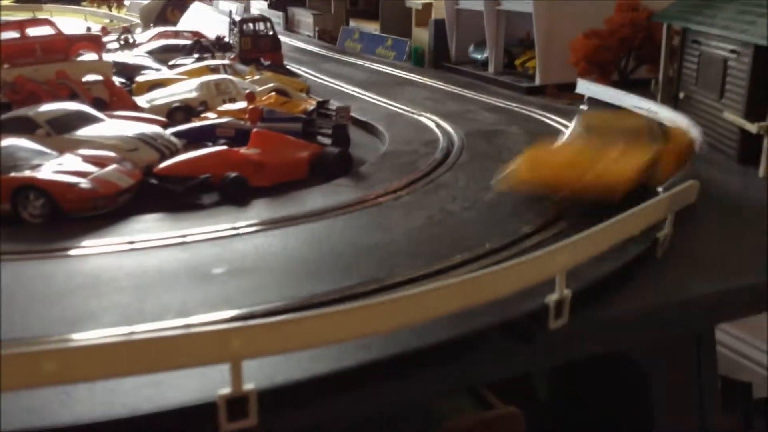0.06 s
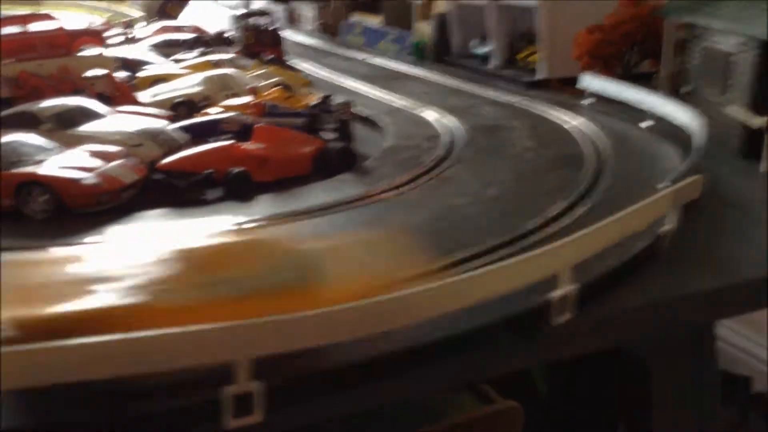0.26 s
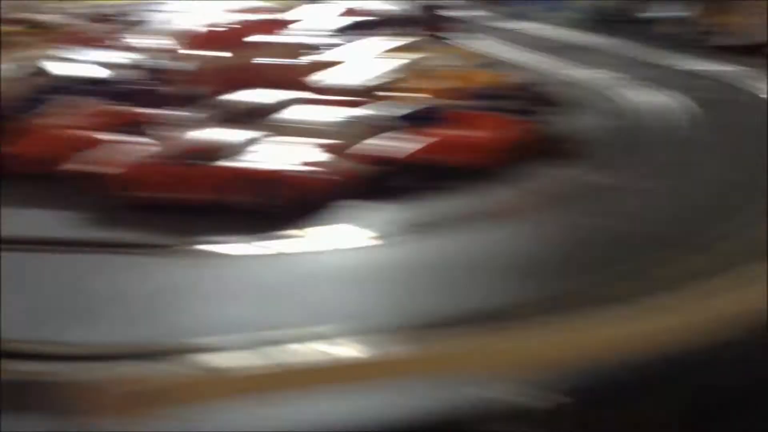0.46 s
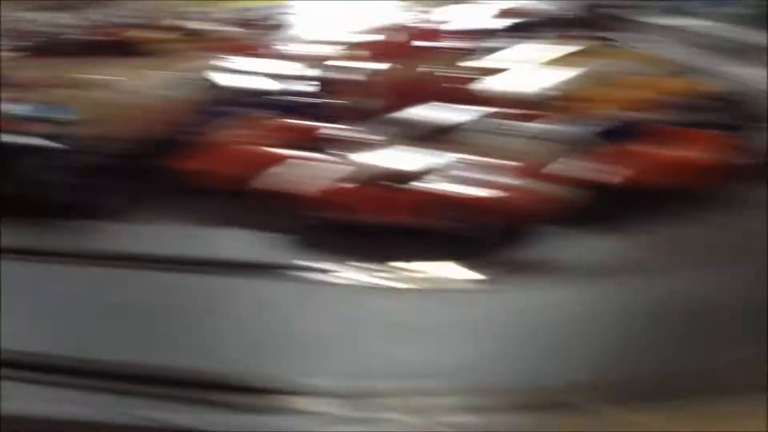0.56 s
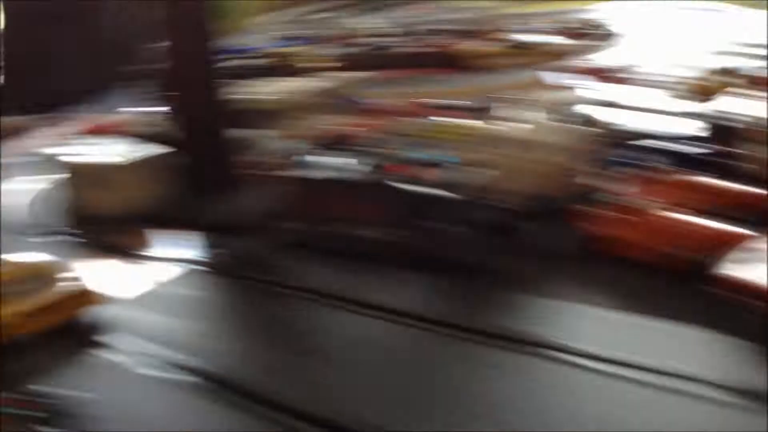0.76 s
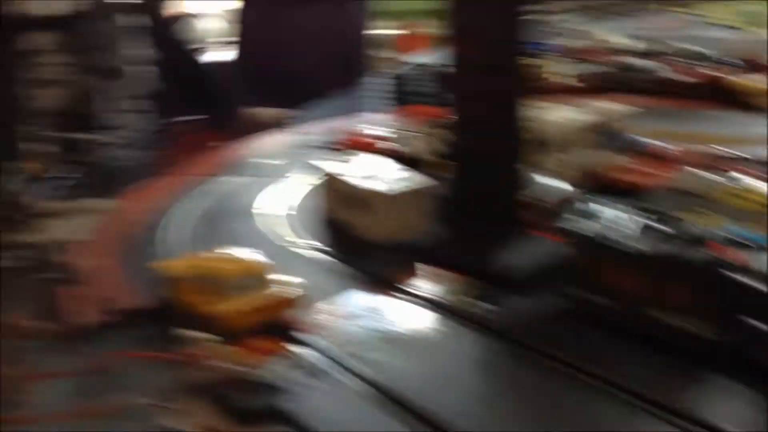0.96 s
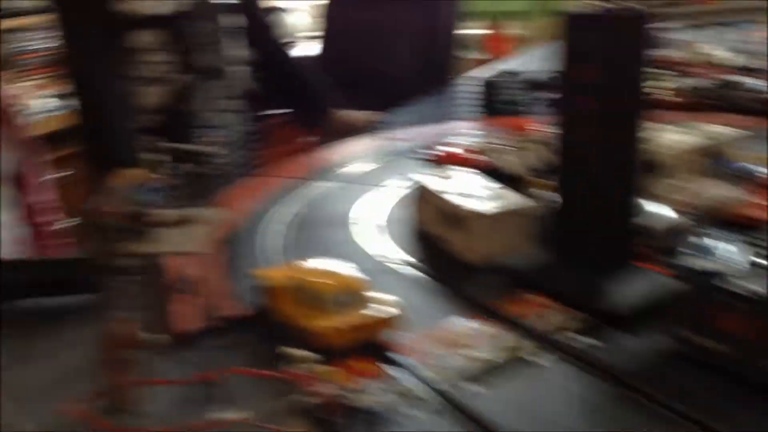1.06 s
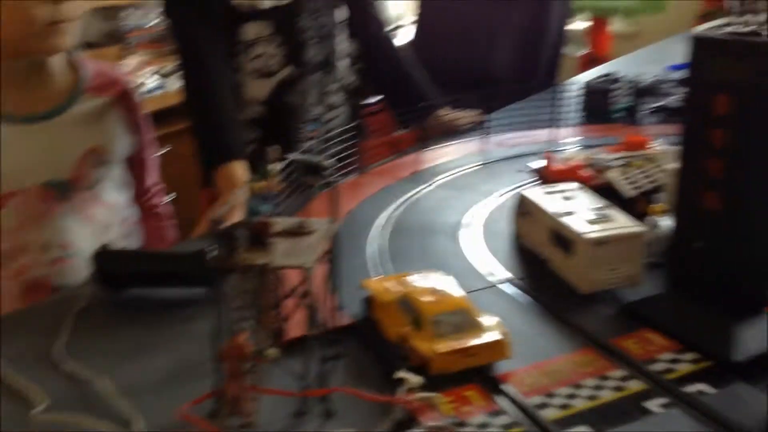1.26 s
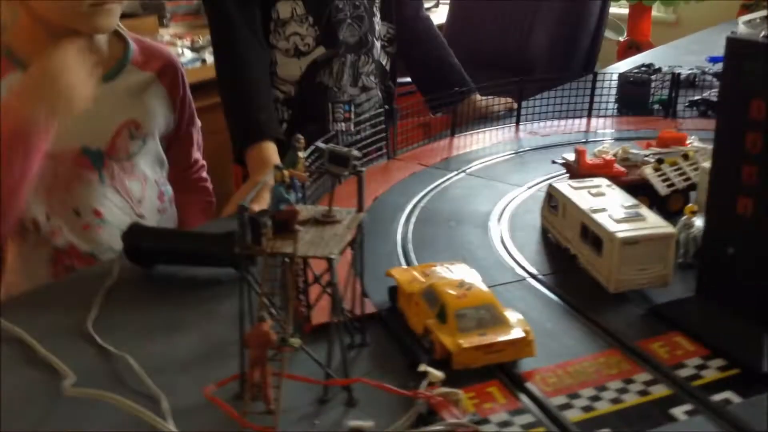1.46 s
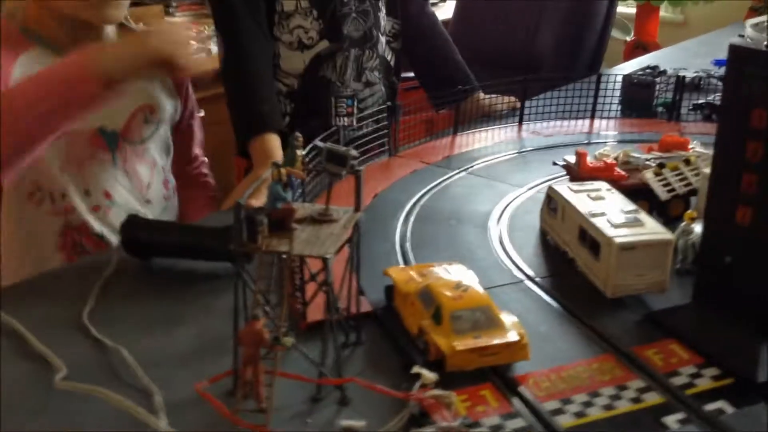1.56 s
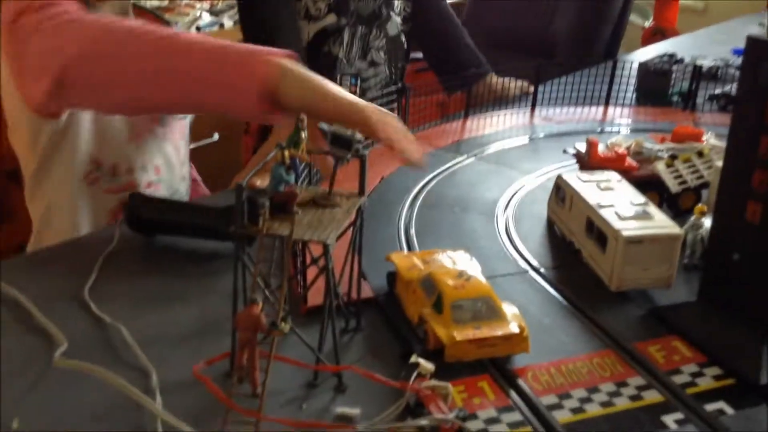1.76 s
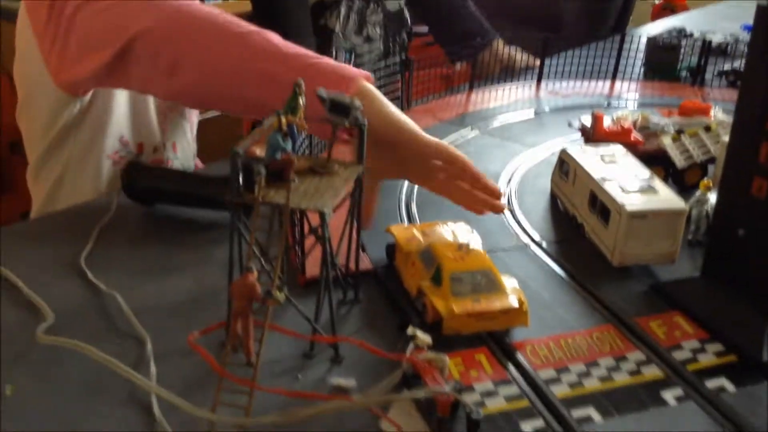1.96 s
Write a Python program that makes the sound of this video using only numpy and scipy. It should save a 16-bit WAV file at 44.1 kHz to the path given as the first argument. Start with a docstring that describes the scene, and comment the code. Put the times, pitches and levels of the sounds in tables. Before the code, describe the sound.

A toy slot car races close by from the start, with a rough gear buzz, a bright metallic scrape, a hollow rumble and quick clacks over the track joints. From about 0.6 seconds it slows and fades, stopping at around 1 second. A soft hiss and a low drone remain in the small room, with a few faint handling knocks between 1.6 and 2 seconds.

```python
"""Toy slot car coasting to a stop.

A slot car rattles round a plastic track close by, clacks over the joints, then coasts to a stop.
Loose gear teeth buzz in the body, the pick-up braids scrape the rails, the hollow track rumbles.
A soft hiss, a low drone and a few faint handling knocks stay on in the small room."""
import sys
import numpy as np
from scipy import signal
from scipy.fft import rfft, irfft
from scipy.io import wavfile
from scipy.ndimage import map_coordinates

SR = 44100
rng = np.random.default_rng(int(sys.argv[2]) if len(sys.argv) > 2 else 0)


def master_out(mix):
    """Clip the mix to full scale and print it as 16-bit PCM to the path in sys.argv[1]."""
    frames = np.transpose(np.atleast_2d(mix))
    ceiling = np.clip(frames, -1, 1)
    pcm = np.round(ceiling * 32767).astype(np.int16)
    wavfile.write(sys.argv[1], SR, pcm)


N = 88773

# motor winding down: time_s, turns_per_s
MOTOR_SPEED = [(0, 104.3), (.45, 101), (.65, 94), (.85, 70), (1.02, 31.3)]
# midrange buzz of the car's body: frequency_hz, relative_db
BODY_COLOUR = [(200, -29.5), (500, -18.5), (650, -13), (750, -7), (860, -9), (970, 1.5), (1500, -2),
               (2100, -1), (3100, -4), (4000, -12.5), (7000, -16.5), (15000, -33)]
# bright scrape of braids on rails: frequency_hz, relative_db
BRAID_COLOUR = [(800, -27), (3000, -13), (4500, -11.5), (5600, -8), (7000, -4.5), (8300, -0.5), (9500, -6),
                (11000, -11), (15000, -21)]
# hollow boom of the track: frequency_hz, relative_db
TRACK_COLOUR = [(40, -16), (100, -21.5), (140, -6), (180, 2.5), (260, -6.5), (350, -0.5), (500, -10.5),
                (900, -6.5), (3000, -62)]


def undb(db):
    """Decibels to gain."""
    return 10 ** (np.asarray(db) / 20)


def unit(x):
    """Scale to an RMS of one."""
    return x / np.sqrt(np.mean(x ** 2))


def curve(rows):
    """Straight lines through (time_s, value) rows."""
    return np.interp(np.arange(N) / SR, *np.array(rows, float).T)


def fading(rows, stop_db_per_s=300):
    """Gain from a level curve that dies away after its last point."""
    past_end_s = np.maximum(np.arange(N) / SR - rows[-1][0], 0)
    return undb(curve(rows) - stop_db_per_s * past_end_s)


def through(x, response):
    """Play a signal through an impulse response."""
    return signal.fftconvolve(x, response)[:N]


def colour(points, size=2048):
    """Minimum-phase response of unit energy with the given spectral shape."""
    hz, db = np.array(points, float).T
    log_f = np.log(np.maximum(np.fft.rfftfreq(size, 1 / SR), 1))
    bass_rolloff = 2 * np.maximum(np.log(hz[0]) - log_f, 0)
    gain = undb(np.interp(log_f, np.log(hz), db))
    cepstrum = irfft(np.log(gain) - bass_rolloff)
    cepstrum[1:size // 2] *= 2
    cepstrum[size // 2 + 1:] = 0
    response = irfft(np.exp(rfft(cepstrum)))
    return response / np.linalg.norm(response)


def walk(rate_hz):
    """Smooth random wander with a spread near 1."""
    return map_coordinates(rng.standard_normal(4096), [np.arange(N) / SR * rate_hz], mode="wrap")


def background(air_db=-56.5, drone_db=-57, waver_db=0.5, sag_start_s=1.6, sag_per_s=0.81):
    """A soft hiss that ebbs, a low wavering drone that sinks near the end, and still room air."""
    # thin, bright hiss: frequency_hz, relative_db
    hiss_colour = [(200, -23.5), (450, -13), (1000, -16), (2500, -11), (4400, -8.5), (6500, -4.5),
                   (8400, -0.5), (10000, -7), (12000, -16), (15000, -21)]
    # ebb of the hiss: time_s, level_db
    hiss_level = [(0, -23), (1.0, -44.5), (1.12, -45), (1.45, -45.5), (1.74, -49), (1.82, -51), (2.01, -53)]
    # drone before it sinks: frequency_hz, relative_db
    drone_colour = [(30, -34), (90, -27), (150, -11), (200, -8.5), (265, 1), (330, 0.5), (400, -10.5),
                    (600, -28.5), (2000, -42)]
    # still room air: frequency_hz, relative_db
    air_colour = [(30, -12), (100, -3), (200, 0.5), (600, 1), (1600, 1.5), (3000, -2), (8000, -10.5),
                  (15000, -24)]
    t = np.arange(N) / SR
    hiss = through(rng.standard_normal(N), colour(hiss_colour)) * undb(curve(hiss_level))
    pitch_ratio = np.exp(-sag_per_s * np.maximum(t - sag_start_s, 0))
    drone = through(rng.standard_normal(N), colour(drone_colour))
    drone = map_coordinates(drone, [np.cumsum(pitch_ratio)], mode="mirror")
    air = through(rng.standard_normal(N), colour(air_colour)) * undb(air_db)
    return hiss + drone * undb(drone_db + waver_db * walk(37)) + air


def room(x, t60_s=0.28, wet_db=-9.5, predelay_s=.004):
    """Close walls and furniture add a short dense tail."""
    t = np.arange(SR // 2) / SR
    tail = rng.standard_normal(len(t)) * (t > predelay_s) * np.exp(-np.log(1000) * t / t60_s)
    return x + undb(wet_db) * through(x, tail / np.linalg.norm(tail))


def wheels():
    """Rolling tyres shake the hollow track."""
    # swells of the rumble: time_s, level_db
    rumble_level = [(0, -52.5), (.3, -48.5), (.5, -46), (.65, -53.5), (.83, -54.5), (.9, -45), (.96, -59.5),
                    (1.04, -78)]
    return through(rng.standard_normal(N), colour(TRACK_COLOUR)) * fading(rumble_level)


def shell(lo_hz=0, hi_hz=SR, attack_s=0.00077):
    """Response of the car's plastic shell: its short rings within a range."""
    # shell resonances: pitch_hz, t60_s, relative_db
    modes = [(960, 0.051, -9), (1065, 0.053, -1.5), (1380, 0.033, -10.5), (2090, 0.048, -15),
             (2350, 0.038, -20), (2550, 0.047, 3), (3490, .03, -4)]
    t = np.arange(SR // 5) / SR
    ring = sum(undb(db) * np.sin(2 * np.pi * hz * t) * np.exp(-np.log(1000) * t / t60)
               for hz, t60, db in modes if lo_hz < hz < hi_hz)
    ring = ring * (1 - np.exp(-t / attack_s))
    return ring / np.linalg.norm(ring)


def clacks(clack_s=0.0035, ring_s=0.0049, thump_s=.022, split_hz=1800, grain_db=2.5):
    """Short chattering blows reach the rails, the body, the shell's low and high rings and the track."""
    # guide, track joints and handling: start_s, tick_db, knock_db, low_ring_db, high_ring_db, thump_db
    hits = [(.02, -16, -55, -43, -29, -69), (.049, -13, -22, -28, -14, -53),
            (.073, -9, -15.5, -21, -18.5, -75), (.086, -25, -32, -24, -40, -57),
            (.147, -14, -34, -22, -12, -61), (.166, -18, -12, -39, -25, -62),
            (.188, -6, -41, -38, -36, -65), (.226, -34, -19, -29, -19.5, -63.5),
            (.236, -26, -35, -15.5, -34, -59), (.25, -32, -21, -18, -17.5, -42),
            (.333, -10.5, -22, -17.5, -18, -63), (.352, -12, -24, -17, -33, -31.5),
            (.403, -30, -20, -23, -22, -64), (.423, -20, -31, -16, -21, -60),
            (.501, -19, -13.5, -36, -19, -41), (.603, -40, -36, -41, -38, -54),
            (.665, -37, -21, -38, -41, -63), (.752, -40, -47, -45, -48, -58),
            (.798, -50, -38, -41, -34, -68), (.874, -44, -27, -44, -48, -44),
            (1.631, -62, -50, -70, -62, -66), (1.693, -41.5, -63, -75, -75, -75),
            (1.748, -56, -48, -55, -64, -57), (2.001, -49, -41.5, -55, -60, -50)]
    layers = [(colour(BRAID_COLOUR), clack_s), (colour(BODY_COLOUR), clack_s),
              (shell(hi_hz=split_hz), ring_s), (shell(lo_hz=split_hz), ring_s),
              (colour(TRACK_COLOUR), thump_s)]
    out = np.zeros(N)
    age = np.arange(SR // 8) / SR
    for start_s, *levels in hits:
        i = int(start_s * SR)
        for db, (response, decay_s) in zip(levels, layers):
            fade = np.exp(-age / decay_s)
            chatter = rng.choice([-1, 1], len(age)) * undb(grain_db * rng.standard_normal(len(age)))
            blow = signal.fftconvolve(fade * chatter, response)
            blow = blow * undb(db) * np.linalg.norm(fade) / np.linalg.norm(blow)
            out[i:i + len(blow)] += blow[:max(N - i, 0)]
    return out


def gears(turns, teeth=9, jitter_teeth=.25, scatter_db=3, trim_db=-1.5,
          ring_db=-11, ring_hold_s=0.44, ring_fade_db_per_s=60):
    """Loose teeth strike unevenly, harder once a turn; the shell's ring fades as the car slows."""
    # surges of the gear rattle: time_s, relative_db
    rattle_level = [(0, -21), (.085, -22), (.11, -24), (.14, -31.5), (.17, -23.5), (.205, -26),
                    (.26, -21.5), (.305, -21), (.345, -21.5), (.385, -24), (.44, -21.5), (.488, -26),
                    (.515, -21.5), (.572, -25), (.614, -21), (.68, -25.5), (.735, -33), (.81, -30.5),
                    (.9, -36), (.97, -43), (1.04, -65)]
    t = np.arange(N) / SR
    tooth = np.floor(turns * teeth + jitter_teeth * walk(500))
    strikes = np.diff(tooth, prepend=0) > 0
    strength = undb(scatter_db * np.clip(rng.standard_normal(N), -2, 2)) * rng.choice([-1, 1], N)
    accent = 1 + 0.13 * np.cos(2 * np.pi * turns)
    # the power holds steady as the strikes thin out
    force = unit(strikes * strength * accent / np.sqrt(curve(MOTOR_SPEED)))
    buzz = through(force, colour(BODY_COLOUR))
    ring_gain = undb(ring_db - ring_fade_db_per_s * np.maximum(t - ring_hold_s, 0))
    return (buzz + ring_gain * through(force, shell())) * fading(rattle_level) * undb(trim_db)


def braids(turns, clicks_per_s=4500, scatter_db=4, smooth_db=1,
           flutter_db=1.4, flutter_hz=89, trim_db=-0.87):
    """Copper braids catch on the rails in dense tiny clicks, their pressure fluttering."""
    # surges of the scrape: time_s, relative_db
    scrape_level = [(0, -14.5), (.025, -10), (.04, -16.5), (.08, -13), (.11, -17.5), (.14, -14), (.16, -15),
                    (.21, -12), (.27, -15), (.31, -15.5), (.42, -16.5), (.485, -19.5), (.55, -18.5),
                    (.62, -22.5), (.73, -35), (.76, -33), (.82, -47), (.9, -36), (.97, -46), (1.02, -63)]
    clicks = (rng.random(N) < clicks_per_s / SR) * rng.choice([-1, 1], N)
    grains = unit(clicks * undb(scatter_db * np.clip(rng.standard_normal(N), -2, 2)))
    pressure = undb(flutter_db * walk(flutter_hz)) * (1 + 0.088 * np.cos(2 * np.pi * turns))
    smooth_scrape = undb(smooth_db) * rng.standard_normal(N)
    force = unit((grains + smooth_scrape) * pressure)
    return through(force, colour(BRAID_COLOUR)) * fading(scrape_level) * undb(trim_db)


def scene():
    """The car in the room over the background; one motor paces the gears and pulses the scrape."""
    turns = np.cumsum(curve(MOTOR_SPEED) * (1 + .015 * walk(20))) / SR
    car = gears(turns) + braids(turns) + wheels() + clacks()
    return (room(car) + background())[None]


def record(dry, ceiling=.85, low_cut_hz=175, top_hz=15350):
    """Round the very tallest peaks, thin the bass and cut the top."""
    rounded = dry / (1 + (dry / ceiling) ** 8) ** (1 / 8)
    thin = signal.sosfilt(signal.butter(1, low_cut_hz, "high", fs=SR, output="sos"), rounded)
    low_pass = signal.ellip(10, .2, 80, top_hz, fs=SR, output="sos")
    return signal.sosfilt(low_pass, thin)


dry = scene()
out = record(dry)
master_out(out)
```